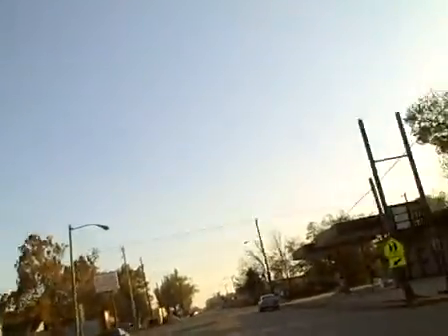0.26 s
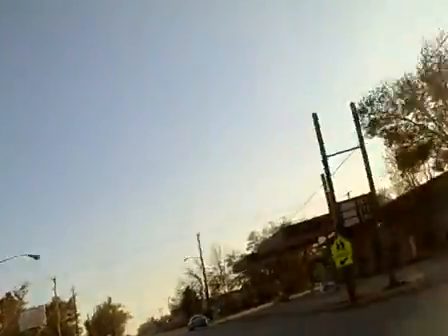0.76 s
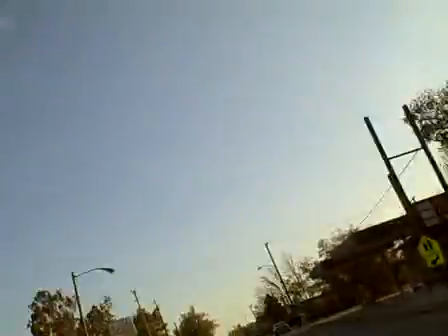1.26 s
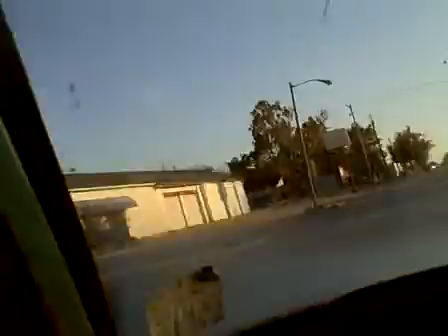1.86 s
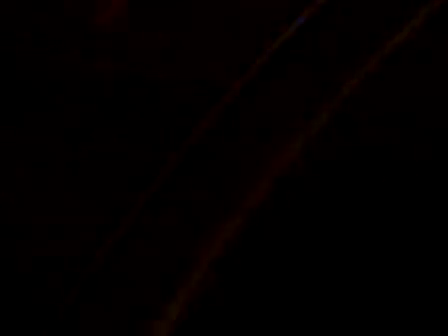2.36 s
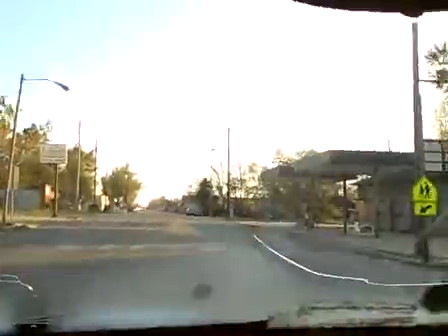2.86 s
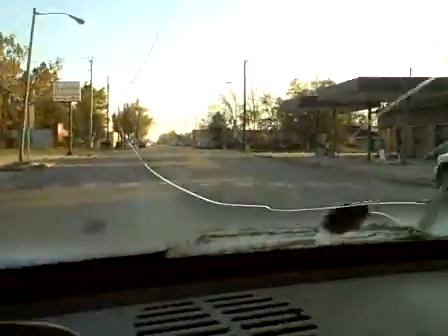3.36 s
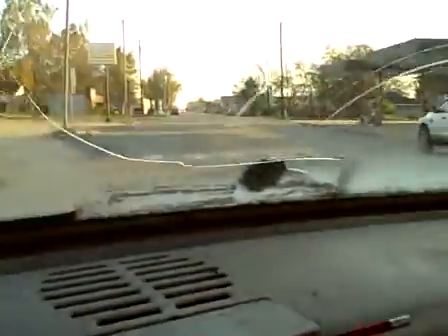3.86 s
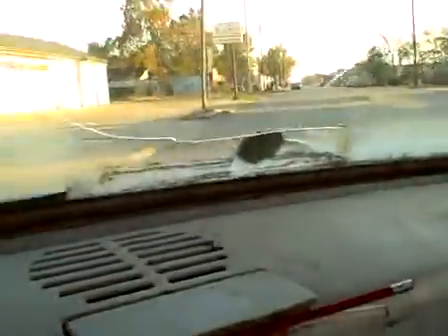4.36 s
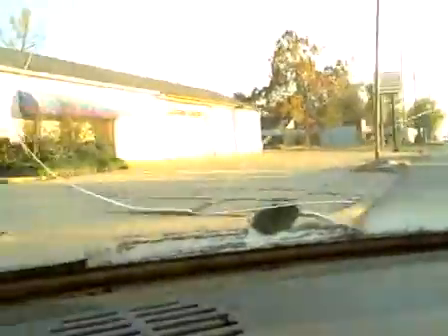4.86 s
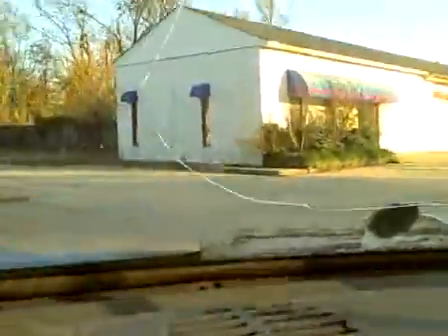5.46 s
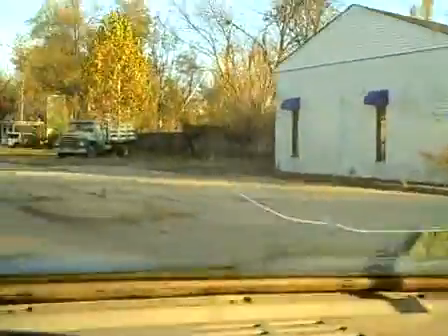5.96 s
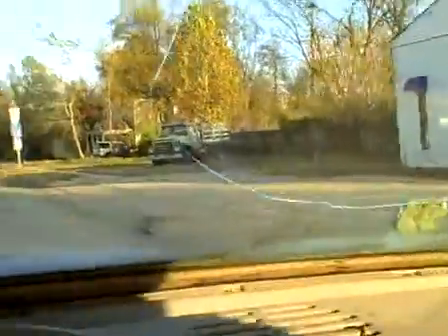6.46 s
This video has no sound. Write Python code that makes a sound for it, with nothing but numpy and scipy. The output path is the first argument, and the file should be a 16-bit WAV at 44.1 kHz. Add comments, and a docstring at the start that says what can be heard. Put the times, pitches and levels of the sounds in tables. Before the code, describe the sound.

Inside an old truck's cab, a V8 idles low and lumpy while a car passes outside with a sinking note and tyre rush. The engine lugs, catches and pulls away, its drone rising with growl, hiss and road roar. Loose metal ticks, knocks and squeaks. A bump thumps late, then a violent jolt overloads the small close microphone.

```python
"""Inside the cab of an old V8 truck that pulls away from idle and gathers speed along a street.
One engine speed drives tones for the exhaust boom and filtered noise for the growl, hiss and road roar.
Loose fittings rattle as bursts of noise, knocks ring panels, and another car goes by with a sinking note.
The truck rides over bumps; the last one jolts the cab with deep swings that overload the small microphone."""
import sys
import numpy as np
from scipy import signal
from scipy.fft import rfft, irfft, next_fast_len
from scipy.io import wavfile
from scipy.ndimage import uniform_filter1d

SR = 44100
rng = np.random.default_rng(int(sys.argv[2]) if len(sys.argv) > 2 else 0)


def generate_wav(signal):
    """Clip the signal to [-1, 1] and save it as 16-bit WAV at the path in sys.argv[1]."""
    frames = np.transpose(np.atleast_2d(signal))
    scaled = np.clip(frames, -1, 1) * 32767
    pcm = np.round(scaled).astype(np.int16)
    wavfile.write(sys.argv[1], SR, pcm)


N = 295911
TIME = np.arange(N) / SR  # seconds
FIRINGS_PER_CYCLE = 8
PULLING_HZ = 75.6  # firings per second once the engine pulls; the levels that follow its speed start here

# Tone colour of the engine's growl, also used for tyres. Each row: frequency in Hz, level in dB per Hz.
GROWL_SPECTRUM = [(220, -4.5), (262, -0.5), (325, 2.5), (365, -2), (395, -3), (460, -3), (560, -6),
                  (700, -6), (1200, -38)]
# Tone colour of tyres roaring on the road. Each row: frequency in Hz, level in dB per Hz.
ROAR_SPECTRUM = [(400, -11.5), (600, -7), (700, -4), (810, 0.5), (900, -1.5), (1000, -2), (1150, -5),
                 (1350, -4), (1600, -13.5), (2100, -20), (4000, -26)]
# Tone colour of the engine bay's hiss, also used for tyres. Each row: frequency in Hz, level in dB per Hz.
HISS_SPECTRUM = [(1200, -5), (2000, -17), (2600, -11), (3080, -8), (3500, -9.5), (4600, -8), (5200, -3),
                 (5650, 1.5), (6000, -4.5), (6500, -10.5), (7300, -16), (8200, -24.5), (9000, -39),
                 (15000, -74.5)]


def from_db(db):
    """Turns decibels into a plain factor."""
    return 10 ** (np.asarray(db) / 20)


def rms_one(x):
    """Scales a signal to an rms (average strength) of 1."""
    return x / np.sqrt(np.mean(x ** 2) + 1e-20)


def gain_at(points, hz):
    """Reads a spectrum's gain at hz, in straight lines over log frequency."""
    point_hz, db = np.transpose(points)
    return from_db(np.interp(np.log(hz + 1e-3), np.log(point_hz), db))


def coloured(x, spectrum):
    """Filters a signal to a spectrum that falls away beyond both ends; rms 1."""
    size = next_fast_len(N)
    hz = np.arange(size // 2 + 1) * SR / size
    low_end = np.minimum(hz / spectrum[0][0], 1) ** 2
    high_end = np.maximum(hz / spectrum[-1][0], 1) ** 4
    gain = gain_at(spectrum, hz) * low_end / high_end
    return rms_one(irfft(rfft(x, size) * gain, size)[:N])


def noise(spectrum):
    """Steady random noise with the given spectrum."""
    return coloured(rng.standard_normal(N), spectrum)


def drift(rate_hz):
    """Smooth random wandering with spread 1; a higher rate wanders faster."""
    step = 20  # drawn at every 20th sample, then joined by straight lines
    r = np.exp(-2 * np.pi * step * rate_hz / SR)
    draws = rng.standard_normal(N // step + 3002)
    slow = signal.lfilter([1], [1, -2 * r, r * r], draws)[3000:]  # skip the filter's start
    return np.interp(np.arange(N) / step, np.arange(len(slow)), rms_one(slow))


def turning(hz):
    """Phase, in radians, of something that turns at hz."""
    return 2 * np.pi * np.cumsum(hz) / SR


def narrow_noise(phase, width_hz):
    """A tone that follows a phase while its strength and timing wander, like a randomly driven resonance."""
    return (drift(width_hz) * np.cos(phase) + drift(width_hz) * np.sin(phase)) / np.sqrt(2)


def resonance(x, hz, width_hz):
    """Rings a signal at one frequency; white noise keeps its power on the way."""
    r = np.exp(-np.pi * width_hz / SR)
    w = 2 * np.pi * hz / SR
    gain = np.sqrt(2 * (1 - r * r)) * np.sin(w)
    return signal.lfilter([gain], [1, -2 * r * np.cos(w), r * r], x + 1e-18)


def burst(s, rise, decay):
    """Envelope that swells to 1 from time s and dies away; all in seconds."""
    age = np.maximum(TIME - s, 0)
    return np.minimum(age / rise, 1) * np.exp(-np.maximum(age - rise, 0) / decay)


def swell(s, half):
    """Envelope that rises smoothly to 1 at time s and falls again; both in seconds."""
    return np.exp(-((TIME - s) / half) ** 2 / 2)


def passing_car(rough=.35):
    """Two exhaust harmonics a fifth apart sink by the Doppler shift; the rush of tyres peaks later."""
    speed_m_per_s, pass_s, distance_m = 17, 1.2, 9.12
    sound_m_per_s = 343
    along_m = speed_m_per_s * (TIME - pass_s)
    receding_m_per_s = speed_m_per_s * along_m / np.hypot(along_m, distance_m)
    low_phase = turning(227 / (1 + receding_m_per_s / sound_m_per_s))  # 227 Hz when abreast
    low_gain = from_db(-30.5) * swell(pass_s, 0.35)
    # the upper harmonic comes out once the tailpipe points this way
    high_phase = low_phase * 3 / 2
    high_gain = from_db(-41) * swell(1.45, 0.34)

    note = 0
    for phase, gain in [(low_phase, low_gain), (high_phase, high_gain)]:
        note = note + gain * (np.sin(phase) + rough * narrow_noise(phase, width_hz=9.4))

    tyres = from_db(-34) * noise(ROAR_SPECTRUM)
    tyres += from_db(-39) * noise(GROWL_SPECTRUM)
    tyres += from_db(-44.5) * noise(HISS_SPECTRUM)
    tyres_s = 2
    tyres_half_s = np.where(TIME < tyres_s, 0.68, 0.5)  # builds more slowly than it fades
    return np.sqrt(2) * note + swell(tyres_s, tyres_half_s) * tyres


def road(cycle, octaves, pulsing=0.11, flutter_db=1.0):
    """Body shake, engine growl pulsing with the firings and road roar grow with speed and swell on bumps."""
    # How the truck's body shakes. Each row: frequency in Hz, level in dB per Hz.
    shake_spectrum = [(10, -10), (18, -1), (33, -1.5), (52, -2), (64, 0), (90, -11), (125, -11.5),
                      (185, -11.5), (225, -15), (262, -28.5), (400, -40)]
    # Bumps in the road. Each row: middle in seconds, half length in seconds,
    # body shake in dB, growl in dB, road roar in dB.
    bumps = [(2.797, 0.51, -26, -49, -40), (5.516, 0.31, -14, -36.5, -40), (6.41, 0.12, -15.5, -33, -39),
             (6.532, 0.091, -7.5, -27, -27.5)]
    # dB at pulling speed, plus dB for each doubling of engine speed
    shake = from_db(-21.5 + 4 * octaves)
    growl = from_db(-38 + 6 * octaves)
    roar = from_db(-38 + 2.9 * octaves)
    for s, half, shake_db, growl_db, roar_db in bumps:
        bump = swell(s, half)
        shake = np.hypot(shake, from_db(shake_db) * bump)  # hypot adds the powers
        growl = np.hypot(growl, from_db(growl_db) * bump)
        roar = np.hypot(roar, from_db(roar_db) * bump)
    firing = np.cos(FIRINGS_PER_CYCLE * cycle)
    growl = growl * (1 + pulsing * firing) * noise(GROWL_SPECTRUM)
    roar = roar * from_db(flutter_db * drift(11)) * noise(ROAR_SPECTRUM)
    return growl + roar + shake * noise(shake_spectrum)


def ticks():
    """Envelope of faint rattles: touches at random moments, each dying away."""
    touches_per_s, level_db, decay_s = 5, -36, 0.0084
    touches = rng.random(N) < touches_per_s / SR
    return from_db(level_db) * signal.lfilter([1], [1, -np.exp(-1 / (decay_s * SR))], touches + 1e-18)


def struck_panel(blow, main_hz):
    """A blow of tiny contacts sets off several broad rings of a panel at once."""
    # How a panel rings. Each row: multiple of its main ring, width in Hz, level in dB.
    panel_rings = [(.38, 149, -13.5), (.7, 201, -24.5), (.98, 170, 1.5), (1.17, 158, 2.5),
                   (1.45, 300, -1.5), (2.2, 560, -8.5), (3.9, 598.7, -29)]
    rings = [from_db(db) * resonance(blow, ratio * main_hz, width) for ratio, width, db in panel_rings]
    return sum(rings)


def fittings(grain_db=2.5, rattle_rise=0.008, squeak_rise=.003, squeak_width_hz=110, soft_hz=5000):
    """Loose metal chatters in tiny contacts; knocks ring panels, the cab drums and trim squeaks."""
    # Buzzes of loose fittings. Each row: start in seconds, level in dB, decay time in seconds.
    rattles = [(0.183, -40.5, 0.011), (0.33, -41.5, 0.049), (.435, -39, 0.037), (0.543, -40, 0.022),
               (0.796, -39, 0.04), (0.902, -34, 0.013), (1.084, -31.5, 0.017), (1.157, -38, 0.011),
               (1.619, -31.5, 0.015), (1.847, -38.5, 0.011), (2.581, -39.5, 0.0064), (2.644, -29.5, 0.0099),
               (2.675, -27, 0.017), (5.666, -30.5, .015), (5.824, -30, 0.031), (6.05, -27, 0.23),
               (6.174, -23.5, 0.014)]
    # Knocks in the cab. Each row: start in seconds, main ring in Hz, ring level in dB,
    # metallic clatter in dB, rise in seconds, decay time in seconds.
    knocks = [(1.049, 724, -35, -65, .001, .008), (1.507, 930, -21.5, -22.5, .0006, 0.0027),
              (1.92, 600, -36, -71, 0.0072, 0.023), (2.578, 740, -30, -26, 0.0019, 0.01),
              (2.644, 930, -34, -40, 0.0054, .028), (5.313, 865, -30, -14.5, 0.012, 0.024),
              (5.606, 1400, -27.5, -37, 0.0026, 0.011), (5.614, 810, -29, -27.5, 0.0058, 0.029),
              (6.502, 664, -30, -16, 0.005, 0.031), (6.559, 880, -32, -8.5, .0027, 0.014),
              (6.595, 606, -36, -25, 0.011, .026)]
    # The cab drums after the bump. Each row: start in seconds, frequency in Hz, level in dB,
    # decay time in seconds.
    drumming = [(5.319, 307.7, -21.5, 0.14), (5.35, 181.7, -15, 0.061)]
    # Squeaks of trim. Each row: start in seconds, middle frequency in Hz, level in dB,
    # decay time in seconds.
    squeak_rows = [(2.025, 3100, -29, 0.0025), (2.435, 3320, -43, 0.028), (2.523, 5670, -26.5, .005),
                   (2.523, 2830, -41.5, 0.017)]
    # Bright sound of metal chattering. Each row: frequency in Hz, level in dB per Hz.
    clatter_spectrum = [(900, -39), (2000, -10.5), (2800, -15.5), (3600, -9.5), (4400, -8.5), (5400, 2),
                        (5900, 0), (6500, -12.5), (7300, -14.5), (8200, -27), (9000, -32.5), (15000, -65.5)]

    contacts = rms_one(rng.standard_normal(N) * from_db(grain_db * drift(570)))
    chatter = ticks()
    for s, db, decay in rattles:
        chatter = chatter + from_db(db) * burst(s, rattle_rise, decay)

    panels = 0
    for s, hz, ring_db, clatter_db, rise, decay in knocks:
        blow = burst(s, rise, decay)
        chatter = chatter + from_db(clatter_db) * blow
        panels = panels + from_db(ring_db) * struck_panel(blow * contacts, hz)
    # blunt contacts put little treble into a panel
    panels = signal.sosfilt(signal.butter(4, soft_hz, fs=SR, output="sos"), panels)

    drum = 0
    for s, hz, db, decay in drumming:
        tone = narrow_noise(2 * np.pi * hz * TIME, width_hz=22)
        drum = drum + from_db(db) * burst(s, rattle_rise, decay) * tone

    squeaks = 0
    for s, hz, db, decay in squeak_rows:
        wandering_hz = hz + squeak_width_hz * drift(185)
        squeaks = squeaks + from_db(db) * burst(s, squeak_rise, decay) * np.sin(turning(wandering_hz))
    return chatter * coloured(contacts, clatter_spectrum) + panels + drum + np.sqrt(2) * squeaks


def singing(firing_hz):
    """Narrow resonances: cab panels ring near their critical engine speeds; a few bands swell briefly."""
    # Brief bands that swell and fade: narrow whines, and broader rushes as the other car's tyres draw near.
    # Each row: middle in seconds, frequency in Hz, width in Hz, level in dB, # half length in seconds.
    brief_bands = [(1.66, 1614, 330, -38.5, .18), (1.66, 1030, 38, -31.5, 0.14), (1.903, 1150, 37, -35.5, 0.12),
                   (2.316, 1000, 150, -29, .075), (1.25, 920, 140, -40, 0.25)]
    # Panels that sing at their own engine speed. Each row: frequency in Hz, width in Hz, level in dB,
    # engine speed in firings per second.
    cab_rings = [(251, 9.1, -39, 45), (148, 7.8, -28.5, 49.5), (246, 5.1, -41, 50.5), (555, 90, -42.5, 50),
                 (797, 54, -41.5, 51), (297, 17, -33.5, 55), (1342, 72, -44.5, 75), (790, 50, -39.5, 80.5),
                 (400, 14, -39.5, 86.5), (206, 40, -26, 88.5)]
    reach_octaves = 0.055  # how far from that speed a panel still sings

    out = 0
    for s, hz, width, db, half in brief_bands:
        out = out + from_db(db) * swell(s, half) * narrow_noise(2 * np.pi * hz * TIME, width / 2)
    for hz, width, db, critical_hz in cab_rings:
        away = np.log2(firing_hz / critical_hz) / reach_octaves
        nearness = 1 / np.hypot(1, away ** 2)
        out = out + from_db(db) * nearness * narrow_noise(2 * np.pi * hz * TIME, width / 2)
    return out


def jolt():
    """The whole cab heaves: deep, slow swings that rise quickly and die away."""
    # Heaves of the cab. Each row: top in seconds, frequency in Hz, peak in dB,
    # rise in seconds, decay time in seconds.
    heaves = [(6.496, 36.9, 5.5, 0.042, 0.026), (6.579, 29.6, 0.5, 0.014, 0.046)]
    out = 0
    for s, hz, db, rise, decay in heaves:
        swing = np.cos(2 * np.pi * hz * (TIME - s))
        out = out + from_db(db) * burst(s - rise, rise, decay) * swing
    return out


def engine_bay(cycle, octaves, tick_depth=0.1, flutter_db=1.15):
    """Hiss that throbs with the valve gear, on the first three multiples of the engine cycle."""
    throb = sum(np.cos(order * cycle + rng.uniform(0, 2 * np.pi)) for order in range(1, 4))
    hiss_db = -37 + 12 * octaves  # 12 dB for each doubling of engine speed
    return from_db(hiss_db + flutter_db * drift(27)) * (1 + tick_depth * throb) * noise(HISS_SPECTRUM)


def lope_level(firing_hz):
    """How hard the unequal cylinders beat, in dB: more at speed, more when speeding up."""
    idle_hz, idle_db, pulling_db = 47.5, -10, -3
    db_per_hz_per_s = 0.0889
    pulling = np.clip((firing_hz - idle_hz) / (PULLING_HZ - idle_hz), 0, 1)
    gaining = uniform_filter1d(np.gradient(firing_hz) * SR, size=SR // 4)  # smoothed over 0.25 s
    return idle_db + (pulling_db - idle_db) * pulling + db_per_hz_per_s * gaining


def exhaust(cycle, firing_hz, waver_db=2.4):
    """A firing note with overtones; unequal cylinders add multiples of the cycle that boom in the cab."""
    # Boom of the cab. Each row: frequency in Hz, gain in dB.
    cab_boom = [(12, -12), (19, -1), (26, -8), (45, 3), (61, -12.5), (74, -11), (84, -2), (97, 3),
                (108, -1), (122, -11), (152, -4), (192, -8), (235, -16.5), (262, -36)]
    # The firing note booms where it meets a resonance of pipe and cab. Each row: frequency in Hz, gain in dB.
    note_boom = [(44, -23.5), (49, -18.5), (56, -15), (72, -15), (85, -19), (93, -12.5), (103, -10.5),
                 (112, -14.5)]
    # Overtones of the firing note. Each row: multiple of the note, level in dB before load and cab boom.
    overtones = [(2, -17), (3, -11), (4, -12)]
    # Multiples 1, 2, 3.. of the eight-firing cycle, the eighth left to the firing note.
    # Each entry: strength in dB before cab boom and lope level.
    cycle_orders = [-35, -19, -23.5, -21, -18, -13, -28.5, -73.5, -35, -19, -24, -28.5, -26.5, -36.5, -22.5,
                    -37.5, -24, -36.5, -22.5, -39, -30, -42, -34, -27, -31, -36]

    firing = FIRINGS_PER_CYCLE * cycle
    note = np.sin(firing)
    load_db = 3.5 * swell(1.67, 0.25)  # the slipping clutch's load brightens the note
    for multiple, db in overtones:
        gain = from_db(db + load_db * (multiple - 1.5)) * gain_at(cab_boom, multiple * firing_hz)
        note += gain * np.sin(multiple * firing + rng.uniform(0, 2 * np.pi))

    lope = 0
    for order, db in enumerate(cycle_orders, 1):
        phase = order * cycle + rng.uniform(0, 2 * np.pi)
        boom = gain_at(cab_boom, order * firing_hz / FIRINGS_PER_CYCLE)
        lope += from_db(db) * boom * (np.sin(phase) + .2 * narrow_noise(phase, 4))

    lug_db = 7.5 * swell(1.18, 0.12)  # the engine lugs as the clutch bites
    note_gain = gain_at(note_boom, firing_hz) * from_db(lug_db + waver_db * drift(7.4))
    return np.sqrt(2) * (note_gain * note + from_db(lope_level(firing_hz)) * lope)


def scene():
    """One engine speed drives exhaust, hiss, road sounds and singing panels; the other sounds join in."""
    # Engine speed over time. Each row: time in seconds, firings per second.
    engine_speed = [(0, 45.2), (1.2, 41.5), (1.42, 47.8), (1.7, 46.2), (1.88, 50), (2.2, 50.8), (2.43, 55),
                    (2.75, 73), (2.98, 76.5), (3.43, 70), (4.1, 80.4), (4.5, 85.6), (5.1, 91.4),
                    (5.5, 96.2), (5.95, 99.5), (6.3, 104.3), (6.5, 110), (6.71, 113.1)]
    s, speed = np.transpose(engine_speed)
    firing_hz = np.interp(TIME, s, speed)
    octaves = np.log2(firing_hz / PULLING_HZ)
    cycle = turning(firing_hz / FIRINGS_PER_CYCLE)
    truck = road(cycle, octaves) + engine_bay(cycle, octaves) + exhaust(cycle, firing_hz)
    return (passing_car() + fittings() + singing(firing_hz) + jolt() + truck)[None]


def record(dry, top_db=-12):
    """The microphone flattens the biggest swings, choking the hiss meanwhile, and dulls the treble."""
    overload, cutoff_hz = .72, 16500
    flattened = dry / (1 + (dry / overload) ** 16) ** (1 / 16)
    size = next_fast_len(N + 2000)
    hz = np.arange(size // 2 + 1) * SR / size
    treble = gain_at([(8000, 0), (9200, top_db)], hz)
    dulled = irfft(rfft(flattened, size) * treble, size)[:, :N]
    # little passes above the cutoff
    return signal.sosfilt(signal.cheby2(12, 70, cutoff_hz, fs=SR, output="sos"), dulled)


dry = scene()
out = record(dry)
generate_wav(out)
```